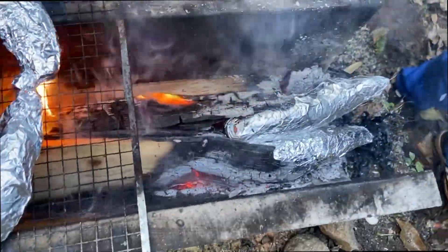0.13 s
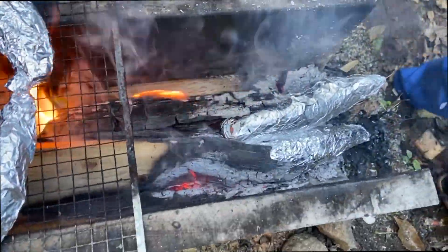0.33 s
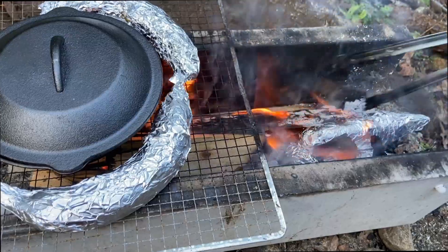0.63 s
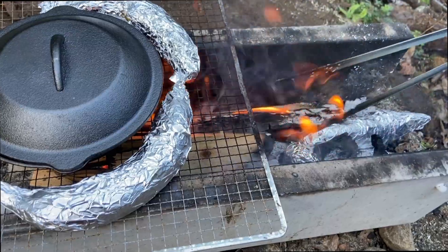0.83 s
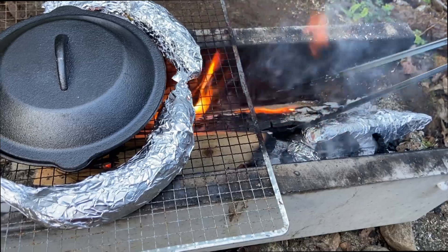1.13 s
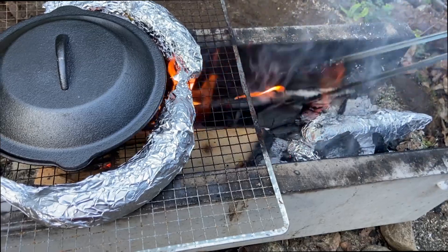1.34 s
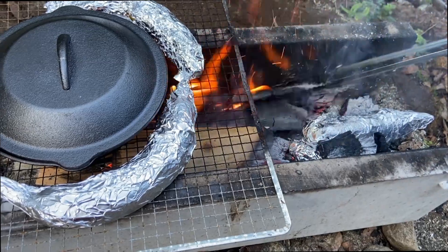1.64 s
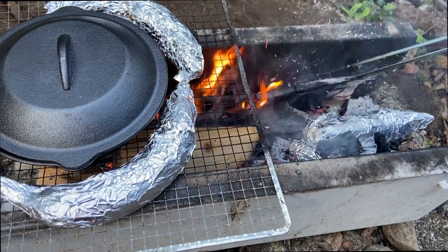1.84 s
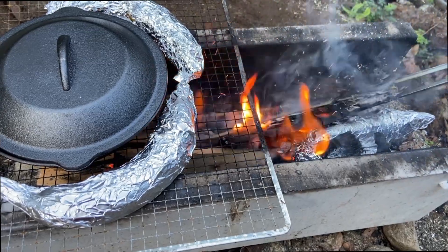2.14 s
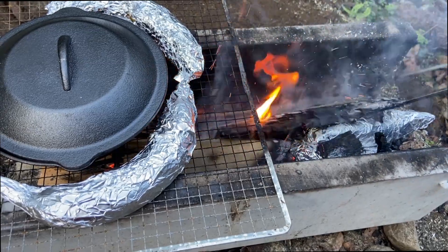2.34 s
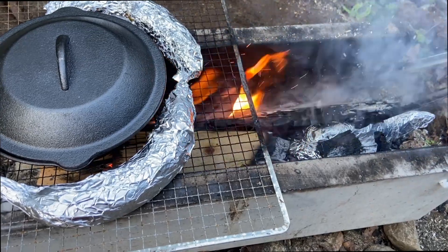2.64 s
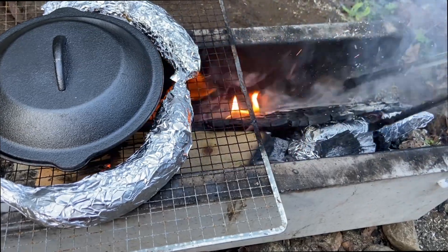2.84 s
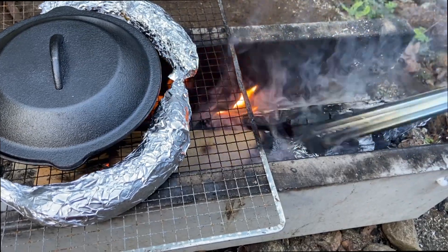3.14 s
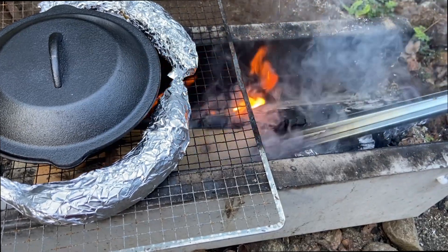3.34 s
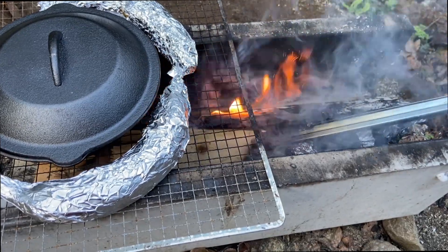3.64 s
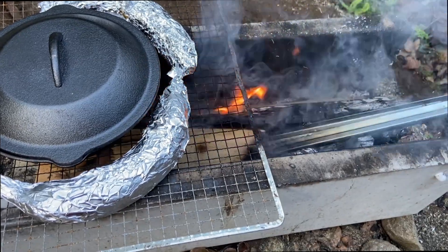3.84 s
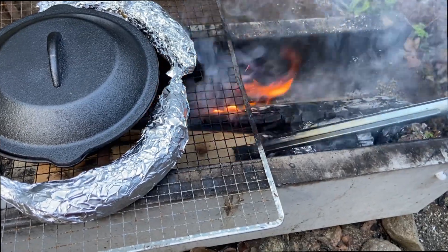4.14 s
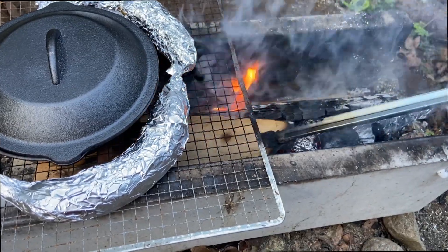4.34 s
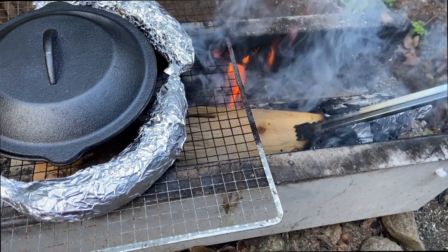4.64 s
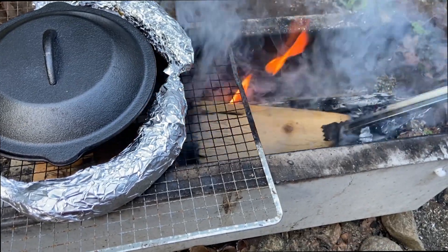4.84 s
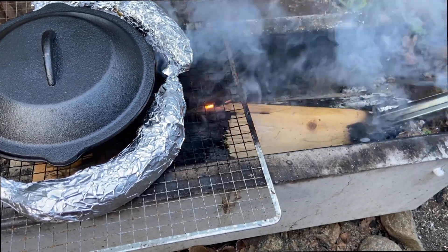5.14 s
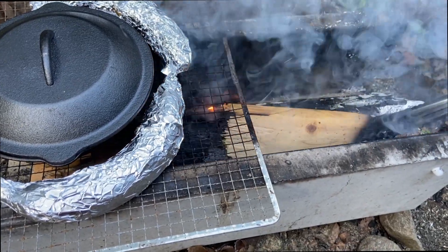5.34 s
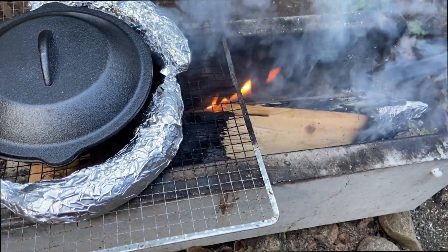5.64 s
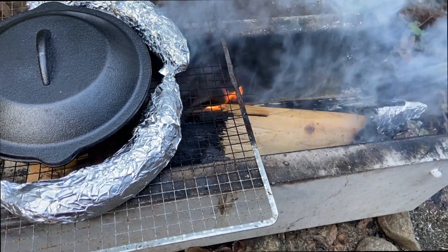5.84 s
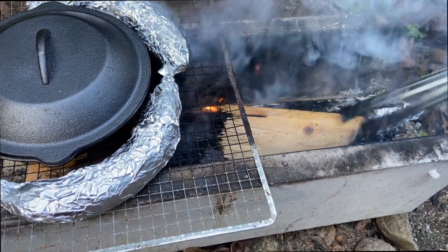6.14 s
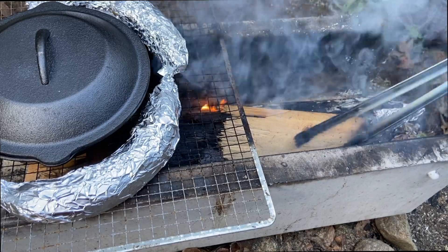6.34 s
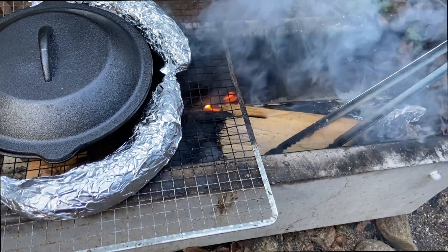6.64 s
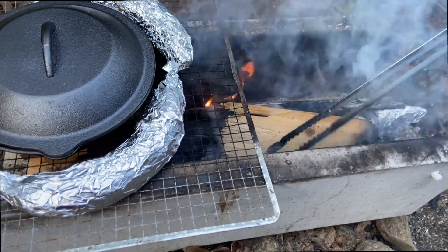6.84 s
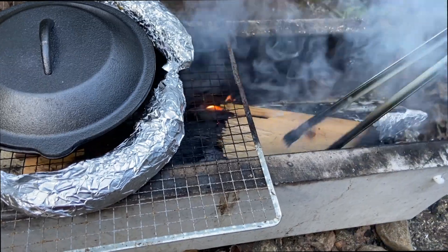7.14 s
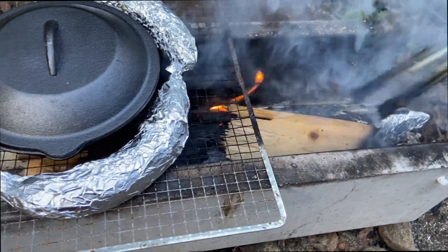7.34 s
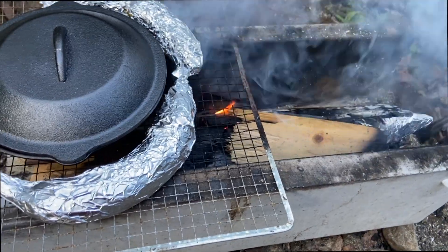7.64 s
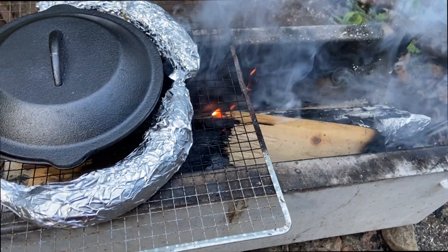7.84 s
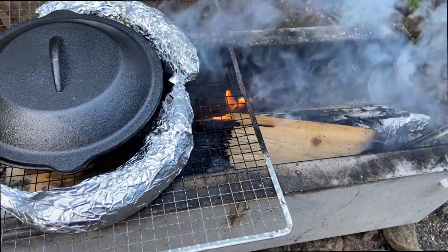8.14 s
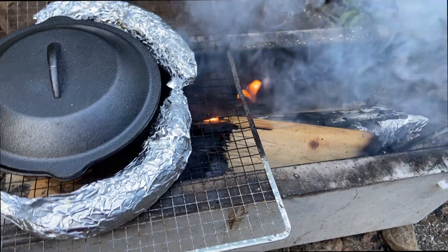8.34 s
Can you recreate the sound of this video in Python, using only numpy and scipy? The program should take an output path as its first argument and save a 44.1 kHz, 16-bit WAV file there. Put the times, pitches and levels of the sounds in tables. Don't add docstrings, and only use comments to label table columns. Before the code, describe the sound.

Close outdoor fire: char rustles, cracks and scrapes on concrete, logs knock hollowly, flames puff low, and insects throb steadily across the yard.

```python
import sys
import numpy as np
from scipy import signal
from scipy.fft import rfft, irfft
from scipy.io import wavfile
from scipy.ndimage import uniform_filter1d

SR = 44100
rng = np.random.default_rng(int(sys.argv[2]) if len(sys.argv) > 2 else 0)


def digitize_waveform(pressure):
    field = np.atleast_2d(pressure).T
    bounded = np.clip(field, -1, 1)
    quanta = np.round(bounded * 32767).astype(np.int16)
    wavfile.write(sys.argv[1], SR, quanta)


def natural_amplitude(level_db):
    exponent = np.asarray(level_db, float) / 20
    return 10 ** exponent


N = 374850
T = np.arange(N) / SR
HZ = np.fft.rfftfreq(N, 1 / SR)


def unit(x):
    return x / np.sqrt(np.mean(x ** 2))


def curve(table):
    s, *columns = np.transpose(table)
    return [np.interp(T, s, c) for c in columns]


def colour(x, points):
    hz, db = np.transpose(points)
    gain_db = np.interp(np.log(HZ + 1), np.log(hz), db)
    return irfft(rfft(x) * natural_amplitude(gain_db), N)


def band(x, hz, width):
    return signal.lfilter(*signal.iirpeak(hz, hz / width, SR), x)


def walk(rate, size=N):
    hold = int(SR / rate)
    levels = np.repeat(rng.standard_normal(size // hold + 1), hold)
    smooth = uniform_filter1d(uniform_filter1d(levels, hold), hold)
    return unit(smooth[:size])


def grit(rate, spread_db):
    breaks = rng.random(N) < rate / SR
    push = rng.standard_normal(N)
    size = np.minimum(rng.exponential(size=N), 4.5)
    return unit(breaks * push * natural_amplitude(spread_db * size))


def add(out, s, x):
    i = int(s * SR)
    out[i:i + len(x)] += x[:N - i]


def burst(db, t60):
    t = np.maximum(T[:SR // 10] - 0.0006, 0)
    noise = np.clip(rng.standard_normal(len(t)), -2, 2) * np.minimum(t / 0.0001, 1)
    spike = noise * np.exp(-t / 0.0005)
    spike = spike / np.abs(spike).max()
    tail = noise * natural_amplitude(-60 * t / np.clip(t60, 0.004, 0.1))
    return natural_amplitude(db - 6.5) * (natural_amplitude(9.5) * spike + tail)


# [f/Hz, left lead/rad, left minus right/dB, scatter/rad]
NEAR_PORTS = [(120, 0, 0, .05), (400, -1, -.5, .3), (1000, -2.5, -8, .6), (1500, -4.2, -12, 1.4),
              (2300, -4.4, -3, .9), (4100, -6, 0, .8), (4800, -5.6, 0, 1.5), (6000, -4.65, 0, .4)]
# [f/Hz, left lead/rad, left minus right/dB, scatter/rad]
FAR_PORTS = [(120, -.1, 0, .1), (400, -1.1, 1.5, 1), (1100, -2.8, 1.8, .8), (2000, -3.1, 0, 1.5),
             (3300, -1.5, 0, 1.5), (4200, -.1, 1, .85), (4800, 1.2, 0, 1.7), (6000, 1.5, 0, .45)]


def ports(x, table, scatter_s):
    port_lag_s, treble_scatter = 7.4 / 44100, 0.3
    hz, lead, pan_db, scatter = np.transpose(table)
    treble_lag = 2 * np.pi * port_lag_s * np.maximum(HZ - hz[-1], 0)
    lead = np.interp(HZ, hz, lead) + treble_lag
    scatter = np.interp(HZ, [*hz, 7000], [*scatter, treble_scatter])
    lead = lead + scatter * walk(scatter_s * SR * SR / N, size=len(HZ))
    side = np.array([[0.5], [-0.5]])
    shadow = natural_amplitude(side * np.interp(HZ, hz, pan_db))
    return irfft(rfft(x) * shadow * np.exp(1j * side * lead), N)


def trough(x):
    t = T[:SR // 20]
    tails = rng.standard_normal((2, len(t))) * natural_amplitude(-60 * t / 0.024) * (t > 0.0005)
    x = colour(x, [(700, -18), (2000, 0)])
    smears = [signal.fftconvolve(x, tail / np.linalg.norm(tail))[:N] for tail in tails]
    return natural_amplitude(-8.5) * np.array(smears)


# [f/Hz, level/dB per Hz]
YARD_TONE = [(60, -89), (88, -86.5), (100, -79), (115, -96.5), (400, -100), (900, -104), (1800, -110),
             (3000, -112), (5200, -97.5), (5800, -104), (6700, -99), (7500, -109), (15800, -112)]


def yard():
    hush = colour(rng.standard_normal(N), YARD_TONE) * np.sqrt(SR / 2)
    return hush * natural_amplitude(1.6 * walk(5))


def singer(hz, rate, fall_hz, weak_db):
    cycle = np.cumsum(rate * (1 + 0.015 * walk(3))) / SR
    stroke, part = cycle.astype(int), cycle % 1
    chance = rng.standard_normal((N // 100, 2)).T
    pitch = hz + fall_hz * (0.5 - part) + 50 * chance[0][stroke]
    gate = np.sin(np.pi * part) ** 0.61 * natural_amplitude(weak_db * (stroke % 2) + 2.2 * chance[1][stroke])
    note = np.sin(2 * np.pi * np.cumsum(pitch) / SR)
    return unit(gate * note * (1 + 0.28 * walk(600)))


def throbs(first_s, gap_s, count):
    return sum(np.exp(-((T - first_s - k * gap_s) / 0.077) ** 2) for k in range(count))


# [f/Hz, level/dB]
WING_TONE = [(3100, -22), (3600, -2.5), (3900, -0.5), (4500, 0), (4800, -2.5), (5400, -20)]


def insects():
    quick, calm = throbs(0.16, 0.2073, count=7), throbs(1.67, 0.2625, count=27)
    throb = quick + calm + 0.22
    trill = natural_amplitude(-55.5) * singer(4030, 65.8, 500, -7.0)
    chorus = natural_amplitude(-58.0) * unit(colour(rng.standard_normal(N), WING_TONE))
    high = natural_amplitude(-54.5) * throb * singer(4340, 65.9, 520, -2.0)
    middle = natural_amplitude(-56.0) * throb * singer(4200, 66.6, 540, -0.5)
    return [colour(x, WING_TONE) for x in (trill, chorus, high, middle)]


def faint_singers():
    shrill = natural_amplitude(-76 + 4 * walk(9)) * singer(5250, 41, 300, -2.5)
    low = natural_amplitude(-62 + 3 * walk(4)) * singer(4150, 65.85, 480, -6)
    return ports(shrill + low, FAR_PORTS, 0.041)


# [t/s, level/dB]
FLAME_LEVEL = [(0.0, -54), (1.25, -54.5), (1.39, -51), (1.5, -40), (1.62, -46.5), (1.8, -54), (2.5, -55),
               (3.0, -63), (3.25, -52), (3.7, -52), (4.35, -66), (4.6, -59), (4.9, -60), (5.5, -75),
               (6.11, -61), (7.7, -57), (8.3, -67), (8.5, -60.5)]
# [f/Hz, level/dB per Hz]
ROAR_TONE = [(25, -43), (40, -15), (60, 1), (85, -0.5), (125, -5), (200, -11.5), (420, -15), (700, -45.5)]
# [t/s, peak level/dB, f/Hz]
THUMPS = [(0.181, -55, 55), (0.561, -40, 102.5), (0.918, -42, 89), (1.125, -51, 105), (1.429, -37, 99.5),
          (1.491, -39, 140), (1.52, -42, 70), (1.553, -44, 110), (1.59, -43, 150), (3.6, -45, 90),
          (5.1, -48, 110), (2.767, -44.5, 129), (3.808, -39, 96), (4.051, -45, 117), (4.154, -43, 93),
          (4.941, -45, 78.6), (5.866, -48, 79.5), (6.032, -47.5, 98), (6.16, -43, 55), (7.268, -47, 107),
          (7.491, -47, 106), (7.71, -47, 98.5)]


def flames():
    roar_db, = curve(FLAME_LEVEL)
    gusts_db = 1.9 * walk(6.5) + 3.35 * walk(22)
    out = natural_amplitude(roar_db + gusts_db - 6) * unit(colour(rng.standard_normal(N), ROAR_TONE))
    t = T[:SR // 5]
    swell = t / 0.023 * np.exp(1 - t / 0.0097)
    sag = t + 0.0038 * (1 - np.exp(-t / 0.0033))
    for s, db, hz in THUMPS:
        add(out, s, natural_amplitude(db + 2.5) * swell * np.sin(2 * np.pi * hz * sag))
    return out


# [f/Hz, level/dB per Hz]
CHAR_TONE = [(2500, -29.5), (3500, -4), (5000, 0), (7000, -1), (10000, -2), (14000, -4.5), (15600, -11)]
# [t/s, peak level/dB, ring f/Hz]
CHIPS = [(1.0585, -56, 3130), (1.078, -47.5, 3150), (1.4159, -36.5, 3040), (1.4634, -38, 1200),
         (1.5964, -39, 3400), (1.7015, -53, 3210), (1.7853, -62, 3170), (1.936, -39, 1200),
         (2.0895, -41, 1290), (2.2039, -46, 1110), (2.2407, -47, 1830), (2.363, -50, 3250),
         (3.3179, -54, 3180), (3.3234, -34, 990), (3.612, -49, 1060), (3.8692, -46, 3050),
         (3.967, -46, 2690), (4.083, -43, 3100), (4.1837, -38, 3200), (4.195, -36, 3150),
         (4.306, -30, 2370), (4.36, -39, 2340), (4.42, -51, 2790), (4.468, -39.5, 2820),
         (4.5441, -54, 2900), (4.7062, -31, 2820), (5.0759, -42, 1030), (5.249, -43.5, 3430),
         (6.6603, -43, 1260), (6.9803, -49, 2440)]
# [t/s, peak level/dB]
FLECKS = [(0.012, -43), (0.2204, -46), (0.3595, -42.5), (0.4329, -55), (1.1105, -39), (1.1403, -40),
          (1.3044, -36), (1.4394, -51), (1.5664, -47), (1.7855, -54), (2.3614, -55), (3.9664, -38.5),
          (4.192, -39), (4.359, -44), (4.5386, -49), (4.7052, -32), (4.808, -42), (4.9244, -47),
          (5.4744, -59), (5.8334, -60), (7.8476, -50)]


def chips(flakes, flecks):
    out, high = np.zeros(N), np.zeros(N)
    for s, db, hz in flakes:
        crack = burst(db, t60=0.03)
        add(out, s, 3.0 * band(crack, hz, 0.22 * hz) + 0.45 * crack)
    for s, db in flecks:
        add(high, s, burst(db, t60=0.012))
    return natural_amplitude(3.0) * out + natural_amplitude(7) * colour(high, CHAR_TONE)


# [f/Hz, level/dB per Hz]
SCRAPE_TONE = [(900, -6.5), (1500, -8), (2000, 2.5), (2300, 3.5), (3200, 0), (4200, -11)]
# [t/s, peak level/dB, midrange against peak/dB]
FIBRE_SNAPS = [(0.0247, -32.5, -15), (0.9606, -42, -16), (1.3546, -25.5, -19.5), (1.393, -35, -32),
               (1.585, -41, -12), (1.636, -25.5, -6), (1.6407, -17.5, -11), (1.8792, -34, -13),
               (1.9361, -32, -15), (2.025, -31.5, -19), (2.416, -47, -9), (2.7265, -38, -14),
               (3.0275, -39, -11), (3.1528, -29, -24), (3.314, -40, -23), (3.344, -31, -6),
               (3.497, -39, -10), (3.751, -36.5, -12), (4.094, -32, -12), (4.15, -33.5, -24),
               (5.0876, -35, -16), (5.2692, -31.5, -4.5), (5.307, -42.5, -6), (7.9827, -44, -4)]
# [t/s, peak level/dB, midrange against peak/dB, time to fade 60 dB/s]
CRUST_SNAPS = [(0.7739, -41.5, -19, 0.013), (0.9019, -32, -22, 0.016), (1.1737, -32.5, -21, 0.043),
               (1.1974, -33, -7, 0.052), (1.2161, -27.5, -6, 0.052), (1.9584, -32.5, -18, 0.054),
               (2.6474, -21, -32, 0.013), (3.2151, -38, -12, 0.041), (3.6237, -33.5, -9, 0.041),
               (4.3003, -28, -14, 0.039), (4.7056, -31, -12, 0.027), (4.7321, -32.5, -8, 0.035),
               (4.7561, -48, -17, 0.027), (4.9334, -40.5, -6.5, 0.065), (5.6393, -50, -26, 0.026),
               (6.0092, -33, -3, 0.012), (6.1802, -45, -26, 0.027), (6.2332, -30, -21, 0.049),
               (7.1676, -43.5, -10, 0.028)]
# [t/s, peak level/dB]
SPARKS = [(0.2463, -17), (0.3425, -37), (0.5343, -43), (2.032, -25), (2.0764, -27), (2.9333, -37),
          (3.2979, -52), (4.005, -31), (4.3054, -24), (5.2155, -34), (5.475, -60), (5.834, -58),
          (5.9885, -31), (6.0856, -34), (6.4527, -43), (6.571, -33), (7.285, -36.5), (7.859, -45),
          (7.9009, -49.5)]
# [t/s, peak level/dB]
LUMP_DROPS = [(0.3584, -53), (0.981, -40.5), (1.1038, -43), (1.4033, -51), (1.4647, -43), (1.626, -37),
              (2.127, -40), (2.296, -44.5), (2.567, -46.5), (3.6623, -49), (3.776, -43), (3.8402, -62),
              (4.446, -41), (4.6801, -39), (4.812, -43), (4.8583, -48), (6.269, -51), (6.7403, -47.5),
              (6.853, -44), (7.002, -56), (8.0025, -40), (8.458, -48)]


def snaps():
    fibre_hz, crust_hz, spark_hz = 9410, 5330, 12700
    high, mid = np.zeros(N), np.zeros(N)
    every = [(s, db, mid_db, t60, crust_hz) for s, db, mid_db, t60 in CRUST_SNAPS]
    every += [(s, db, mid_db, 0.028, fibre_hz) for s, db, mid_db in FIBRE_SNAPS]
    every += [(s, db, -30, 0.01, spark_hz) for s, db in SPARKS]
    for s, db, mid_db, t60, hz in every:
        crack = burst(db, t60)
        ring_hz = hz * (1 + 0.043 * rng.standard_normal())
        add(high, s, crack + 0.91 * band(crack, ring_hz, 1000))
        add(mid, s, crack * natural_amplitude(mid_db))
        if hz == spark_hz:
            add(high, s, -0.95 * band(crack, 5200, 7000))
    for s, db in LUMP_DROPS:
        add(mid, s, burst(db, t60=0.035))
        add(high, s, burst(db - 6, t60=0.035))
    return natural_amplitude(3.0) * colour(high, CHAR_TONE) + natural_amplitude(8.5) * colour(mid, SCRAPE_TONE)


# [t/s, char level/dB, scrape against char/dB, wood against char/dB]
POKES = [(0.36, -62.5, -3.5, -4), (0.98, -60, -2.5, 4), (1.208, -44, 0, -1), (1.366, -41.5, -6.5, -4),
         (1.638, -42, -7, -1), (2.052, -41.5, -7, -4.5), (2.13, -43, -25, -11), (2.26, -51.5, -1, 0),
         (2.43, -47, -2.5, 3), (2.733, -58, -12, 3.5), (3.17, -61, -20, 11), (3.334, -42.5, -5, -4),
         (3.641, -50.5, -7, 5.5), (4.311, -52, 10, -2.5), (4.68, -49.5, 6, 1.5), (4.989, -53.5, 1.5, 13),
         (5.26, -49.5, -7, -5), (5.97, -70, -16, -11), (6.25, -54, -15.5, -3), (6.59, -56, 4.5, 5),
         (6.8, -55, 1, -8), (6.86, -65.5, 4, 13), (7.0, -56.5, -7, -13), (7.189, -58, 2.5, -4),
         (7.79, -61, -3, 2.5), (8.0, -55.5, -10, 4.5), (8.49, -58, -9, -3), (1.54, -55, -3, 10)]
# [start t/s, end t/s, char level/dB, scrape against char/dB, wood against char/dB]
DRAGS = [
    (0.037, 0.33, -66.5, 7.5, 1),
    (0.713, 0.948, -73, -0.5, -5.5),
    (1.793, 1.966, -49, -8, -7),
    (3.486, 3.567, -59.5, 0.5, 2),
    (3.752, 4.052, -54, -2, -13.5),
    (4.122, 4.26, -51, 0.5, 0.5),
    (4.45, 4.86, -55.5, 4.5, -1),
    (5.055, 5.137, -54, -12, -9),
    (6.374, 6.637, -58, -10.5, -2.5),
    (8.233, 8.324, -61, -2, 3),
]
# [char level/dB, scrape against char/dB, wood against char/dB]
SETTLING = (-73, -8, -4)


def strokes():
    press_db_s, lift_db_s = 182, 142
    t = T[::64]
    pokes = [(s, s, *rest) for s, *rest in POKES]
    start, end, db, scrape_db, wood_db = np.transpose([*pokes, *DRAGS])
    before = np.maximum(start[:, None] - t, 0)
    after = np.maximum(t - end[:, None], 0)
    swell = natural_amplitude(2 * (db[:, None] - press_db_s * before - lift_db_s * after))
    rest_db, *rest_rel = SETTLING
    levels = []
    for rel, r in zip([0 * db, scrape_db, wood_db], [0, *rest_rel]):
        power = natural_amplitude(2 * rel) @ swell + natural_amplitude(2 * (rest_db + r))
        levels.append(np.interp(T, t, np.sqrt(power)))
    return levels


# [f/Hz, width/Hz, level/dB]
WOOD_TONES = [(428.5, 64, 8.5), (667, 71, 0.5), (882, 340, 4.5), (1167, 47, -11.5)]


def raking():
    clumps = walk(45)
    fine = grit(8000, 2.1) * natural_amplitude(2.5 * clumps)
    coarse = grit(1700, 2.5) * natural_amplitude(2.1 * clumps + 3.75 * walk(25))
    wood = 0
    for hz, width, db in WOOD_TONES:
        wood = wood + natural_amplitude(db + 4.7 * walk(12)) * band(coarse, hz, width)
    char = natural_amplitude(1.0) * unit(colour(fine + 0.7 * band(fine, 5700, 2000), CHAR_TONE))
    scrape = natural_amplitude(-1.5 + 3.5 * walk(35)) * unit(colour(fine + 0.77 * coarse, SCRAPE_TONE))
    return np.array(strokes()) * np.array([char, scrape, natural_amplitude(-2.5) * unit(wood)])


def sizzle(x, patchy_db, rate):
    tones, place = rfft(x), 3 * np.log2(HZ / 700 + 1e-9)
    out = irfft(tones * np.clip(1 - place, 0, 1), N)
    for k in range(1, 15):
        flicker = natural_amplitude(patchy_db * walk(rate) - patchy_db ** 2 / 9.6)
        out = out + flicker * irfft(tones * np.clip(1 - np.abs(place - k), 0, 1), N)
    return out


# [t/s, f/Hz, level/dB]
SAP_JETS = [
    [(.1, 8050, -79), (.13, 7950, -59), (.2, 8800, -56), (.23, 9250, -48)],
    [(.345, 7600, -68), (.365, 8020, -47), (.4, 8030, -50), (.412, 8000, -73)],
    [(0, 2393, -59), (.2, 2350, -58.5), (.32, 2336, -62.5), (.4, 2310, -75)],
]


def jets():
    out = 0
    for jet in SAP_JETS:
        hz, db = curve(jet)
        alive = (T > jet[0][0]) & (T < jet[-1][0])
        out = out + alive * natural_amplitude(db) * walk(900) * np.sin(2 * np.pi * np.cumsum(hz) / SR)
    return out


# [t/s, peak level/dB, f/Hz, time to fade 60 dB/s]
LOG_KNOCKS = [(0.569, -46, 383, 0.049), (0.961, -45, 460, 0.07), (1.273, -44, 405, 0.2),
              (1.409, -41.5, 377, 0.043), (1.438, -42, 247, 0.051), (1.639, -30, 420, 0.031),
              (1.879, -51, 283, 0.17), (1.963, -42, 445, 0.039), (2.014, -43, 890, 0.052),
              (2.088, -42.5, 611, 0.2), (2.403, -54, 721, 0.1), (2.44, -37, 252, 0.026),
              (2.644, -56, 207, 0.077), (2.72, -30, 464, 0.046), (3.062, -47.5, 337, 0.042),
              (3.154, -33, 873, 0.038), (3.296, -44.5, 434, 0.089), (3.624, -41, 730, 0.046),
              (4.003, -47.5, 856, 0.084), (4.047, -45.5, 414, 0.06), (4.704, -37, 1273, 0.044),
              (6.009, -44, 444, 0.041), (6.234, -46, 670, 0.11), (6.849, -47, 295, 0.06),
              (7.098, -43, 272, 0.099), (7.714, -55, 202, 0.061), (7.956, -45, 410, 0.041),
              (7.988, -44, 412, 0.087)]


def knocks(table):
    out, t = np.zeros(N), T[:SR // 5]
    for s, db, hz, t60 in table:
        up = rng.uniform(1.27, 2.62, 2)
        fade = natural_amplitude(-60 * t / np.clip(t60, 0.015, 0.2))
        turn = 2 * np.pi * hz * (t + 0.00066 * (1 - np.exp(-t / 0.0012)))
        note = 0.78 * np.sin(turn) + 0.46 * np.sqrt(fade) * sum(np.sin(u * turn) for u in up)
        grain = rng.standard_normal(len(t))
        splinter = unit(band(band(grain, 1.6 * hz, 2.2 * hz), 1.7 * hz, 1.9 * hz))
        thud = 0.87 * unit(band(grain, hz, 0.78 * hz))
        thud = thud + 0.41 * min(hz / 460, 1) ** 3 * fade * splinter
        blow = natural_amplitude(db) * np.minimum(t / 0.0024, 1) * fade
        add(out, s, blow * (note + min(0.08 / t60, 1) * thud))
    return out


# [t/s, peak level/dB, f/Hz, time to fade 60 dB/s]
MORE_KNOCKS = [
    (2.135, -45, 617, 0.12),
    (2.084, -46, 1260, 0.1),
    (2.045, -45, 900, 0.07),
    (2.722, -36, 760, 0.04),
    (6.01, -45, 640, 0.04),
    (5.862, -58, 300, .1),
    (3.17, -46, 300, .08),
    (5.27, -48, 500, .05),
    (6.855, -47, 800, .05),
]
# [t/s, peak level/dB, ring f/Hz]
MORE_CHIPS = [(1.642, -33, 2100), (6.235, -45, 1950), (6.272, -48, 1900), (2.033, -43, 2000),
              (2.048, -45, 2000), (2.128, -45, 2150), (3.215, -46, 900), (7.001, -50, 2300),
              (6.01, -38, 5900), (1.217, -38, 2000), (4.15, -42, 6000), (1.416, -42, 1100),
              (1.198, -42, 1200), (1.304, -46, 1300), (1.879, -45, 1200), (4.36, -44, 1200),
              (6.66, -48, 6000), (7.956, -48, 6200), (0.981, -46, 1200), (4.094, -44, 2200),
              (1.273, -46, 6200), (2.567, -50, 2600)]
# [t/s, peak level/dB]
MORE_TICKS = [(0.7365, -52), (1.2294, -46), (1.3744, -39), (2.0414, -41), (2.1834, -45), (3.1088, -53),
              (3.5154, -48), (3.5753, -50), (3.5922, -47), (3.6374, -38), (4.783, -48), (5.1492, -50),
              (5.653, -49), (5.8681, -48), (5.964, -55), (6.189, -53), (7.655, -55), (7.9523, -53),
              (7.992, -48), (8.4033, -55)]
# [t/s, level/dB, contact/s, tilt/dB an octave, most woken f/Hz]
TOUCHES = [
    (6.98, -72, 0.04, -5, 689),
    (7.19, -72, .03, -5, 689),
    (7.18, -61, .03, 0.5, 5800),
    (7.09, -68, .06, 0.5, 5300),
]


def more_sounds():
    small = knocks(MORE_KNOCKS) + chips(MORE_CHIPS, MORE_TICKS)
    touches = ports(tongs(TOUCHES), NEAR_PORTS, 0.011)
    return ports(small, NEAR_PORTS, 0.003) + trough(small) + touches


# [t/s, level/dB, contact/s, tilt/dB an octave, most woken f/Hz]
CLINKS = [
    (1.355, -42.5, 0.004, 16, 10900),
    (5.228, -58, 0.032, 14, 10930),
    (5.303, -62, 0.016, 22, 11000),
    (6.233, -39.5, 0.0023, 1.5, 6150),
    (6.27, -54.5, 0.0036, -2, 5400),
    (6.975, -68, 0.017, -4.5, 6100),
    (7.079, -69, 0.098, -5.5, 5000),
    (7.175, -58, 0.038, -3, 5760),
]
# [f/Hz, level/dB, time to fade 60 dB/s]
STEEL_NOTES = [(689, -18, 0.25), (1230, -20, 0.15), (1745, -21, 0.17), (2293, -18, 0.11), (3470, -9.5, 0.1),
               (5330, -5, 0.11), (5500, -7, .14), (5800, -9, 0.27), (6160, -2.5, 0.13), (6170, -9, 0.11),
               (8043, -9, 0.17), (8400, -1, 0.094), (9780, -6, 0.11), (11080, -1.5, 0.082)]


def tongs(table):
    out, t = np.zeros(N), T[:SR // 3]
    hinge = STEEL_NOTES * np.array([1.035, 1, 0.5]) - [0, 7, 0]
    hz, note_db, t60 = np.transpose([*STEEL_NOTES, *hinge])[:, :, None]
    for s, db, contact, tilt_db, woken_hz in table:
        chance = rng.standard_normal((len(hz), 2)).T[:, :, None]
        woken_db = 6.5 * np.exp(-(np.log(hz / woken_hz) / 0.024) ** 2)
        level_db = note_db + tilt_db * np.log2(hz / 8000) + woken_db + 1.2 * chance[0]
        fed = np.minimum(t / 0.00043, 1) * natural_amplitude(-60 * np.maximum(t - contact, 0) / t60)
        chatter = np.array([1 + 0.45 * walk(200, size=len(t)) for _ in hz])
        notes = np.sin(2 * np.pi * (hz * (1 + 0.0024 * chance[1]) * t + chance[0]))
        add(out, s, natural_amplitude(db) * np.sum(natural_amplitude(level_db) * fed * chatter * notes, 0))
    return out


def scene():
    char, scrape, wood = raking()
    char, scrape = sizzle(char, patchy_db=3, rate=70), sizzle(scrape, patchy_db=3.5, rate=50)
    near = [char, scrape, wood, tongs(CLINKS) + jets()]
    far = [*insects(), flames(), yard()]
    struck = snaps() + knocks(LOG_KNOCKS) + chips(CHIPS, FLECKS)
    hits = ports(struck, NEAR_PORTS, 0.003) + trough(struck)
    beside = sum(ports(x, NEAR_PORTS, 0.01) for x in near) + natural_amplitude(-4.0) * trough(sum(near))
    around = sum(ports(x, FAR_PORTS, 0.04) for x in far)
    return hits + beside + around + more_sounds() + faint_singers()


def joint_stereo(x, drop_db=-7, faint_db=-39, sudden_db=8.0):
    x = np.pad(x, ((0, 0), (552, 0)))
    sum_and_difference = np.array([x[0] + x[1], x[0] - x[1]]) / 2
    hz, _, pair = signal.stft(sum_and_difference, SR, "cosine", nperseg=2048)
    edges = np.r_[0, np.geomspace(56, 320, 18).round().astype(int), 352:1025:32]
    width = np.diff(np.r_[edges, 1025])
    power = np.add.reduceat(np.abs(pair) ** 2, edges, axis=1) / width[:, None]
    power = np.repeat(power, width, axis=1)
    edge = np.pad(np.diff(x[0], 4) ** 2, (512, 4096))[:1024 * pair.shape[2]]
    edge = edge.reshape(-1, 8, 128).mean(2)
    steady = edge.max(1) < natural_amplitude(2 * sudden_db) * np.median(edge, axis=1)
    pitch = hz[:, None]
    weaker = power < natural_amplitude(2 * drop_db + 4 * (pitch > 11500)) * power[::-1]
    masked = power < natural_amplitude(2 * faint_db) * power[:, hz > 3000].max((0, 1))
    lost = (weaker & (pitch > 6300)) | (masked & (pitch > 1200)) | (pitch > 15850)
    kept = pair * ~(lost & steady)
    mid, side = signal.istft(kept, SR, "cosine", nperseg=2048)[1][:, 552:552 + N]
    return np.array([mid + side, mid - side])


def top_cut(x):
    return signal.sosfilt(signal.butter(12, 17160, fs=SR, output="sos"), x)


def record(dry):
    cut = colour(dry, [(20, -24), (45, 3), (15800, -1.0), (16900, -6), (17300, -58)])
    mix = joint_stereo(cut)
    return top_cut(mix)


dry = scene()
out = record(dry)
digitize_waveform(out)
```